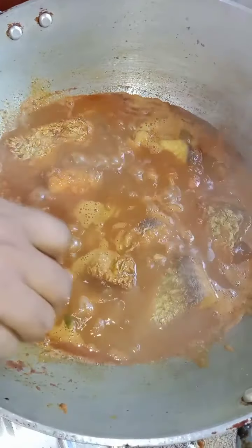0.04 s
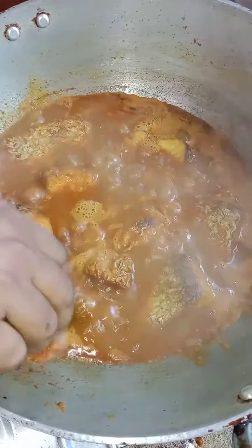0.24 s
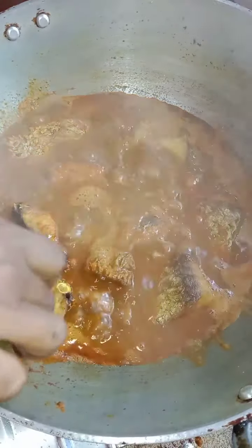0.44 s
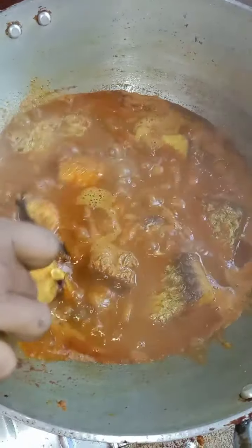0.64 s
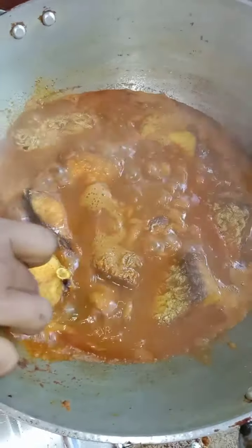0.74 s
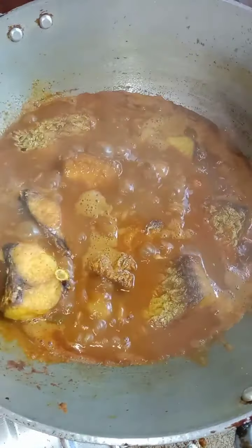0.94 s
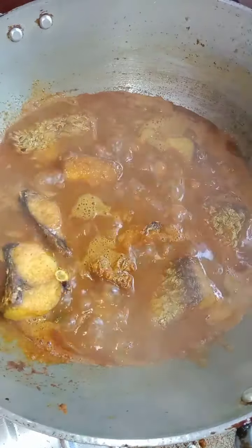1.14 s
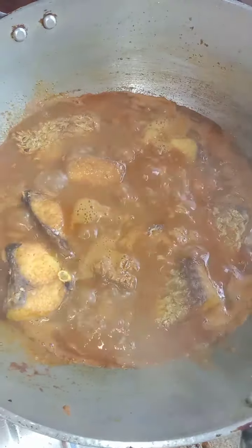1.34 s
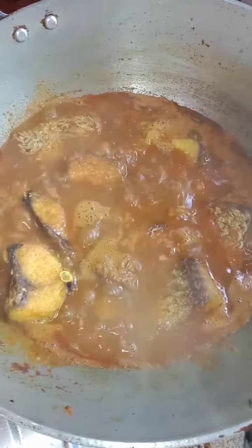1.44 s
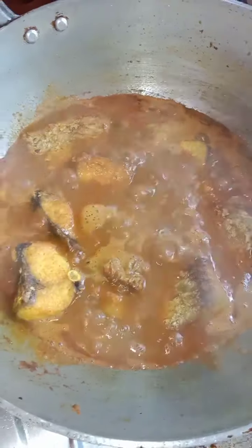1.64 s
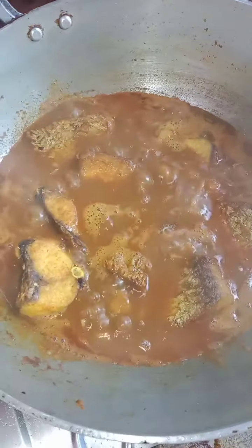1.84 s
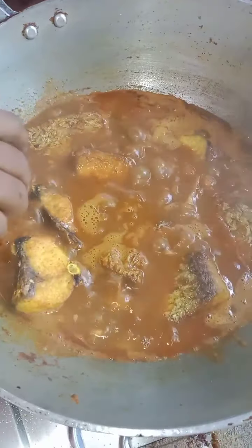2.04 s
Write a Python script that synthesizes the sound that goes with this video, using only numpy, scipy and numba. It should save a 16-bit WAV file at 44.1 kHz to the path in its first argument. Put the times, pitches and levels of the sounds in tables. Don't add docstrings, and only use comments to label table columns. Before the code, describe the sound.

Thick gravy simmering in a metal pan, bubbles popping, fat crackling, one sharp spatter early on

```python
import sys
import numpy as np
from scipy import signal
from scipy.fft import rfft, irfft
from scipy.io import wavfile
from scipy.ndimage import uniform_filter1d
from numba import njit

SR = 44100
rng = np.random.default_rng(int(sys.argv[2]) if len(sys.argv) > 2 else 0)


def amplitude_ratio(level_db):
    exponent = np.asarray(level_db, float) / 20
    return 10 ** exponent


def master_out(mix):
    frames = np.transpose(np.atleast_2d(mix))
    ceiling = np.clip(frames, -1, 1)
    pcm = np.round(ceiling * 32767).astype(np.int16)
    wavfile.write(sys.argv[1], SR, pcm)


N = 92610
SIZZLE_TOP_HZ = 10770

# t/s of the peak, level/dB of the peak, f/Hz
GLUGS = [(0.018, -54.5, 151), (0.429, -33.5, 215), (.448, -41.5, 313), (.461, -41.5, 273),
         (0.475, -40.5, 237), (0.501, -40, 223), (0.527, -48, 261), (0.561, -50, 208), (0.592, -52, 228),
         (.66, -55.5, 165.5), (0.687, -53, 210), (0.832, -54.5, 154), (.852, -56, 210), (1.0, -55.5, 199),
         (1.039, -52.5, 210), (1.054, -66, 111), (1.32, -62.5, 155), (1.395, -53.5, 215), (1.448, -63, 202),
         (1.711, -80, 207), (1.829, -57.5, 215), (1.862, -54, 215), (1.881, -49, 215)]


def shade(x, points):
    hz, db = np.array(points, float).T
    f = np.arange(len(x) // 2 + 1) * SR / len(x) + 1
    gain = amplitude_ratio(np.interp(np.log(f), np.log(hz), db))
    y = irfft(rfft(x) * gain, len(x))
    return y / np.std(y)


def band(x, hz, width_hz):
    hz_safe = min(hz, .45 * SR)
    return signal.lfilter(*signal.iirpeak(hz_safe, hz / max(width_hz, 1), SR), x)


def lowpass(x, hz):
    return signal.sosfilt(signal.ellip(8, .5, 60, hz, fs=SR, output="sos"), x)


def walk(rate):
    k = int(SR / rate)
    steps = np.repeat(rng.standard_normal(N // k + 1), k)
    w = uniform_filter1d(uniform_filter1d(steps, k), k)[:N]
    return w / np.std(w)


def crackle(rate, spread_db):
    return rng.standard_normal(N) * amplitude_ratio(spread_db * walk(rate))


@njit
def bubbles(size, start, gain, hz, rise, fall, glide, lead):
    out = np.zeros(size)
    for e in range(len(start)):
        phase = 0.
        period = SR / hz[e]
        first = int(start[e] - lead * rise * period)
        for i in range(int((rise + 6 * fall) * period)):
            cycle = i / period
            j = first + i
            phase += 2 * np.pi / period * (1 + glide * (cycle - rise))
            if 0 <= j < size:
                if cycle < rise:
                    env = np.sin(.5 * np.pi * cycle / rise) ** 2
                else:
                    env = np.exp(-((cycle - rise) / fall) ** 1.3)
                out[j] += gain[e] * env * np.sin(phase)
    return out


def burst(rows, rise, fall, glide, trim_db, lead=.2):
    s, db, hz = np.array(rows, float).T
    return bubbles(N, s * SR, amplitude_ratio(db + trim_db), hz, max(rise, .3), max(fall, .3), glide, float(lead))


def pan(x, flicker_db=0.):
    # f/Hz, width/Hz, level/dB
    modes = [(1000, 175, -13.5), (1454, 247, 2), (3400, 860, 2), (5400, 880, -5.5), (6690, 400, 0),
             (7870, 580, -3.5), (11030, 180, -35)]
    through_db, flicker_rate_hz = -6, 25.15
    rings = (amplitude_ratio(db + flicker_db * walk(flicker_rate_hz)) * band(band(x, hz, width), hz, 2 * width)
             for hz, width, db in modes)
    return amplitude_ratio(through_db) * x + sum(rings)


def kitchen(x, wet_db):
    t60_s, gap_s = 0.15, 0.0042
    t = np.arange(SR // 3) / SR
    decay = amplitude_ratio(-60 * (t / t60_s) ** 0.66)
    tail = rng.standard_normal(len(t)) * decay * np.clip(t / gap_s - 1, 0, 1)
    tail = tail * amplitude_ratio(wet_db) / np.sqrt(np.sum(tail ** 2))
    return x + signal.fftconvolve(x, tail)[:N]


def hiss():
    # f/Hz, level/dB
    air_spectrum = [(30, -23), (114, -3.5), (300, 1), (600, -2.5), (1470, -4), (2500, -19), (6540, -8.5),
                    (10500, -12)]
    hum_hz, hum_width_hz = 215, 18.7
    hum = band(rng.standard_normal(N), hum_hz, hum_width_hz) * amplitude_ratio(5.2 * walk(7.42))
    burner = shade(rng.standard_normal(N), air_spectrum) * amplitude_ratio(-67.5)
    burner = lowpass(0.34 * burner + pan(burner, flicker_db=4.), SIZZLE_TOP_HZ)
    floor = amplitude_ratio(-82) * rng.standard_normal(N)
    return burner + amplitude_ratio(-51.5) * hum + floor


def simmer(t):
    # f/Hz, density/dB per Hz
    crowd_spectrum = [(560, -13.5), (850, -4.5), (1500, -5), (2300, -14), (3500, -17), (5000, -23)]
    # t/s, level/dB
    heat = [
        (0, -1),
        (.5, 6),
        (.8, -3),
        (1.3, 1),
        (1.75, -3.5),
        (2.1, -1),
    ]
    u = rng.random((700, 3)).T
    level_db = np.minimum(-3.0 * np.log(u[1]), 12)
    rows = np.array([u[0] * N / SR, level_db, 550 * 9 ** u[2]]).T
    crowd = shade(burst(rows, rise=2.45, fall=7.8, glide=0.0076, trim_db=0), crowd_spectrum)

    u = rng.random((1500, 3)).T
    level_db = np.minimum(-5.5 * np.log(u[1]), 13) - 3
    rows = np.array([u[0] * N / SR, level_db, 4500 + 5500 * u[2]]).T
    fat = lowpass(burst(rows, rise=2.4, fall=4.4, glide=0., trim_db=1.5), SIZZLE_TOP_HZ)

    heat_gain = amplitude_ratio(np.interp(t, *np.array(heat).T))
    return heat_gain * (amplitude_ratio(-64.5) * pan(crowd) + amplitude_ratio(-59.5) * pan(fat))


def slosh(t):
    level_db, delay_s, spread_s = -15, .02, 0.03
    env = sum(amplitude_ratio(db + level_db) * np.exp(-((t - s - delay_s) / spread_s) ** 2) for s, db, hz in GLUGS)
    low = band(band(rng.standard_normal(N), 110., 125.), 110., 125.)
    high = band(band(rng.standard_normal(N), 290., 183.), 290., 183.)
    return env * (low / np.std(low) * amplitude_ratio(-16.5) + high / np.std(high) * amplitude_ratio(-15))


def glugs(t):
    return burst(GLUGS, rise=3.434, fall=2.95, glide=0.0046, trim_db=-5.5, lead=0.99) + slosh(t)


def spits(t):
    # t/s, level/dB, length/s
    jets = [(.02, -77, .018), (.06, -78, .025), (.454, -46, .0015), (.572, -72, .035), (.645, -73, .025),
            (.718, -78, .006), (.895, -78, .012), (.945, -76, .03), (1.2, -76, .008), (1.337, -74, .04),
            (1.392, -74, .004), (1.79, -79, .012), (2.088, -78, .012)]
    hz, width_hz = 12300, 4500
    fizz = band(band(crackle(500., 4), hz, width_hz), hz, width_hz)
    env = sum(amplitude_ratio(db) * (t > s) * np.exp(-(np.abs(t - s) / d) ** 3) for s, db, d in jets)
    return fizz / np.std(fizz) * env


def snaps():
    # t/s of the peak, level/dB of the peak, f/Hz
    droplets = [(0.0095, -43, 9100), (0.0293, -42, 8060), (0.0835, -43, 6600), (0.1003, -51, 7560),
                (0.1571, -42, 6960), (0.1861, -42, 8000), (0.2712, -47, 6600), (0.2815, -50, 6560),
                (0.3119, -51, 7900), (0.3728, -29.5, 6080), (0.4983, -38, 6400), (0.5814, -36, 6900),
                (0.6873, -53, 5400), (0.7027, -54, 7390), (0.7168, -41, 8100), (0.7356, -45, 6830),
                (0.8117, -54, 6060), (0.8388, -44.5, 7690), (0.869, -60, 7760), (0.8979, -57, 7020),
                (0.9071, -52, 7700), (0.946, -47, 8920), (1.0098, -49, 6040), (1.0426, -52, 6700),
                (1.0688, -42, 6630), (1.2074, -47, 7450), (1.269, -41.5, 5500), (1.3641, -57, 6900),
                (1.4469, -46, 7460), (1.4868, -51, 7500), (1.5376, -42, 6690), (1.5493, -46, 5800),
                (1.5851, -40, 6900), (1.6606, -64, 5700), (1.6726, -46, 6500), (1.7057, -67, 7760),
                (1.7482, -61, 5930), (1.7773, -55, 8060), (1.8134, -44.5, 8300), (1.8205, -48, 6640),
                (1.8723, -44.5, 7720), (1.8871, -45, 7250), (1.9267, -45.5, 5710), (1.9533, -51, 5600),
                (1.9797, -40, 5540), (1.9966, -48, 6100), (2.0342, -43, 6700), (2.0416, -52, 6680),
                (.4725, -39, 9800), (0.5277, -42, 9000), (0.5468, -50, 9000), (0.56, -48, 8100),
                     (0.576, -36.5, 8840), (0.5966, -43, 8300), (1.322, -54, 8600), (1.339, -49, 9900),
                     (1.5975, -44, 7700), (1.961, -40, 7560), (2.0603, -41, 7200)]
    rows = np.array(droplets)
    return burst(rows, rise=3., fall=4.2, glide=0., trim_db=-2.0, lead=1)


def spatter(t):
    # t/s, level/dB, decay/s
    cracks = [
        (.3897, -34, .0006),
        (.3994, -21, .0005),
        (.4008, -22, .0009),
        (.4068, -32, .001),
        (.4135, -30, .003),
    ]
    # f/Hz, density/dB per Hz
    splat_spectrum = [(1000, -31.5), (1460, -17.5), (1840, -7.5), (3310, -10.5), (4570, -10), (6680, -2),
                      (10000, -9), (15600, -13)]
    spray_s, spray_rise_s, spray_decay_s, spray_db = .388, .011, 0.031, -28
    fizz_db, fizz_decay_s = -22, 0.045
    grit = shade(crackle(700., 3), splat_spectrum)
    sharp = shade(rng.standard_normal(N), splat_spectrum)
    crack_env = sum(amplitude_ratio(db) * np.exp(-((t - s) / d) ** 2) for s, db, d in cracks)
    late = np.maximum(t - spray_s, 0)
    swell = 1 - np.exp(-(late / spray_rise_s) ** 2)
    spray = grit * amplitude_ratio(spray_db) * swell * np.exp(-(late / spray_decay_s) ** 1.08)
    fizz = band(crackle(280., 1.2), 5730., 650.) * amplitude_ratio(fizz_db) * np.exp(-late / fizz_decay_s)
    splat = sharp * crack_env + spray
    return 0.25 * splat + pan(splat) + swell * fizz


def gurgle():
    # t/s, length/s, level/dB, f/Hz
    vents = [(0.535, 0.072, -55, 2340), (0.571, 0.049, -57, 3400), (0.776, 0.077, -58, 1000),
             (0.838, 0.032, -65.5, 1830), (1.91, 0.032, -70.5, 2540), (1.197, 0.044, -53.5, 1330),
             (1.198, 0.036, -66, 2070), (1.363, 0.13, -59, 926), (1.401, 0.013, -55.5, 2440),
             (1.47, 0.12, -61, 2750), (1.536, 0.048, -62.5, 4430), (1.88, 0.045, -58, 1390),
             (1.882, 0.04, -61.5, 826)]
    pitch_spread = 0.16
    u = rng.random((len(vents), 9, 3))
    s, length, db, hz = np.array(vents, float).T[:, :, None]
    pitch = hz * (1 + pitch_spread * (2 * u[..., 2] - 1))
    rows = np.array([s + length * u[..., 0], db + 11.1 * u[..., 1], pitch])
    return burst(rows.reshape(3, -1).T, rise=2.63, fall=4.3, glide=0.0011, trim_db=-5.0)


def pop(rows, rise, fall, glide, trim_db):
    rows = np.array(rows, float)
    u = rng.random((len(rows), 2)).T
    shift = [0.00094 * u[0], np.full(len(rows), -14.0), rows[:, 2] * (0.16 + .5 * u[1])]
    over = rows + np.array(shift).T
    tone = burst(rows, rise, fall, glide, trim_db)
    overtone = burst(over, rise, fall, glide, trim_db)
    skin = burst(rows * [1, 1, 1.8], rise=0.39, fall=1.0, glide=0., trim_db=trim_db - 19)
    return tone + overtone + skin


def surface_bubbles():
    # t/s, level/dB of the peak, f/Hz
    large = [(0.067, -48.5, 1570), (0.083, -37, 1630), (0.136, -52, 1436), (0.161, -42.5, 1510),
             (0.2, -35, 1590), (0.233, -36.5, 2340), (0.346, -48, 1560), (0.372, -38.5, 1520),
             (0.398, -27.5, 2350), (0.431, -37.5, 1560), (0.546, -47.5, 2380), (0.562, -40, 1610),
             (0.613, -42, 1500), (0.675, -44, 1000), (0.695, -47.5, 1090), (0.71, -41.5, 1600),
             (0.769, -49.5, 1070), (0.838, -42, 1510), (0.958, -46.5, 1460), (0.973, -37, 1412),
             (1.014, -48.5, 641), (1.095, -50, 1105), (1.119, -39.5, 1490), (1.209, -48.5, 796),
             (1.256, -32.5, 1280), (1.864, -39, 1370),
             (0.018, -48.5, 1420), (.036, -47, 1474), (0.049, -46, 1460), (.322, -47, 2580),
                  (.447, -45.5, 687), (1.224, -48, 2320), (.464, -46, 700), (1.025, -47, 1870),
                  (1.035, -53.5, 706), (1.123, -48.5, 1586), (1.257, -37.5, 2100), (1.267, -49, 1210),
                  (1.984, -53.5, 975), (2.026, -50.5, 2030), (2.076, -55.5, 660)]
    # t/s, level/dB of the peak, f/Hz
    small = [(0.0514, -59.5, 2820), (0.135, -50.5, 3280), (0.2155, -50, 3700), (0.2355, -37, 3433),
             (0.348, -44.5, 3700), (0.3865, -40, 2880), (0.398, -39.5, 2950), (0.6484, -56.5, 3790),
             (0.6863, -61, 3680), (0.8359, -63.5, 3480), (0.945, -57.5, 3450), (1.065, -60.5, 3740),
             (1.233, -60.5, 3660), (1.894, -59, 3330)]
    # t/s,
    # level/dB of the peak, f/Hz
    tiny = [(0.119, -44.5, 6470), (0.143, -46, 7000), (0.253, -39, 6640), (0.2598, -55, 6400),
            (0.348, -37, 6670), (0.3529, -42, 6800), (0.3875, -21.5, 6080), (0.3988, -19, 6700),
            (0.4003, -18, 7940), (0.572, -48, 5400), (0.606, -45.5, 5500), (0.807, -50, 5750),
            (0.9778, -42.5, 6460), (1.1564, -47.5, 6850), (1.243, -42.5, 5500), (1.2888, -48, 7550),
            (1.3239, -47, 5270), (1.35, -43.5, 6680), (1.3553, -51, 6370), (1.394, -47, 9160),
            (1.457, -41.5, 5620), (1.5719, -40.5, 6780), (1.862, -50, 4900), (1.9605, -44.5, 5600),
            (2.0602, -49, 5420)]
    blops = pop(np.array(large), rise=3.86, fall=4.67, glide=0.00027, trim_db=-3)
    plips = pop(small, rise=4.85, fall=8.7, glide=.004, trim_db=6.5)
    ticks = pop(tiny, rise=3.5, fall=7.7, glide=0.0013, trim_db=2)
    return lowpass(blops + gurgle() + plips + ticks, SIZZLE_TOP_HZ)


def scene():
    t = np.arange(N) / SR
    background = hiss() + glugs(t)
    fat = kitchen(spatter(t) + spits(t), wet_db=-11) + kitchen(snaps(), wet_db=-6)
    gravy = kitchen(surface_bubbles() + simmer(t), wet_db=-3.5)
    return (background + fat + gravy)[None]


def low_pass(x):
    return signal.sosfilt(signal.butter(12, 15800, fs=SR, output="sos"), x)


def record(dry):
    top_hz = 15720
    mix = lowpass(lowpass(dry, top_hz), top_hz)
    return low_pass(mix)


dry = scene()
out = record(dry)
master_out(out)
```